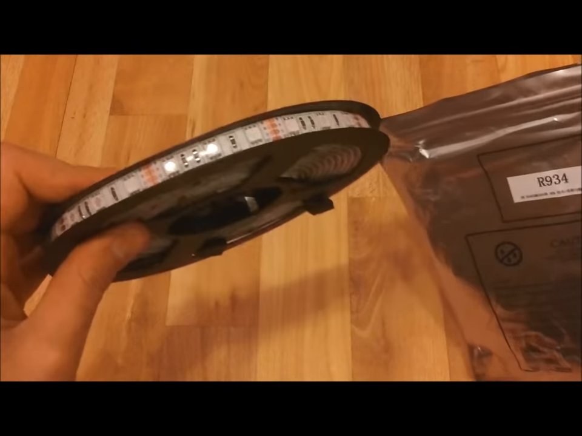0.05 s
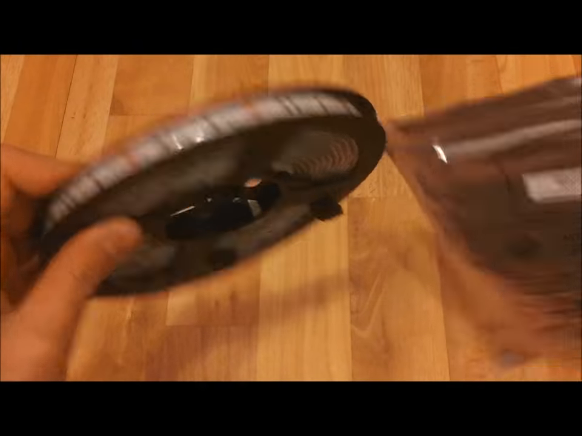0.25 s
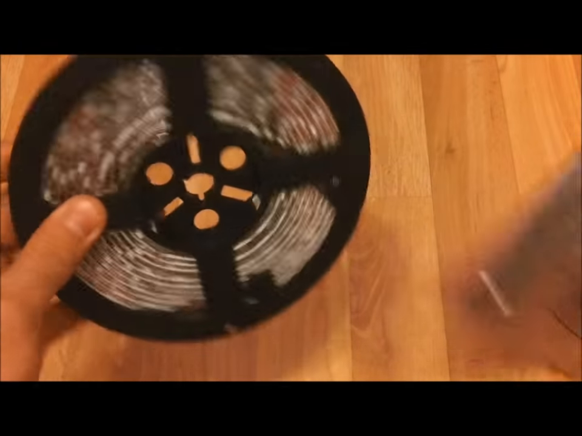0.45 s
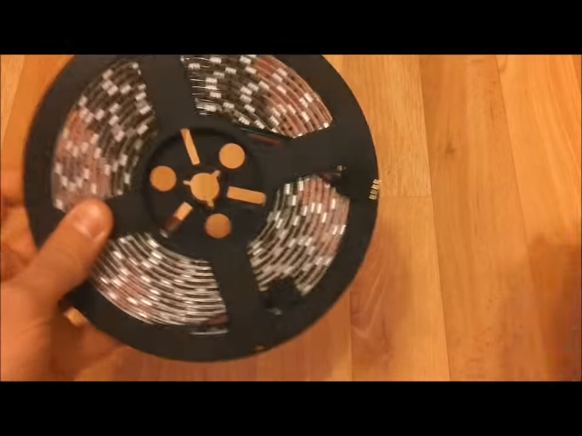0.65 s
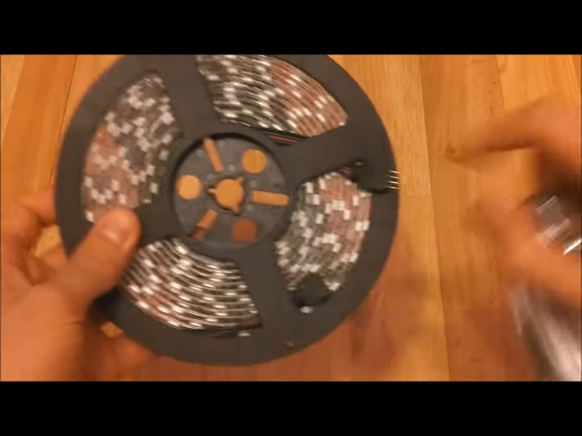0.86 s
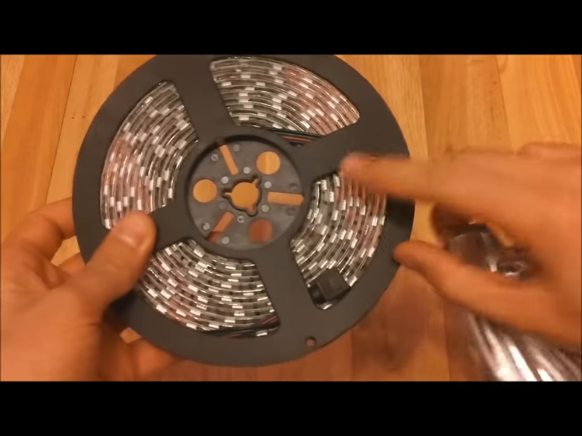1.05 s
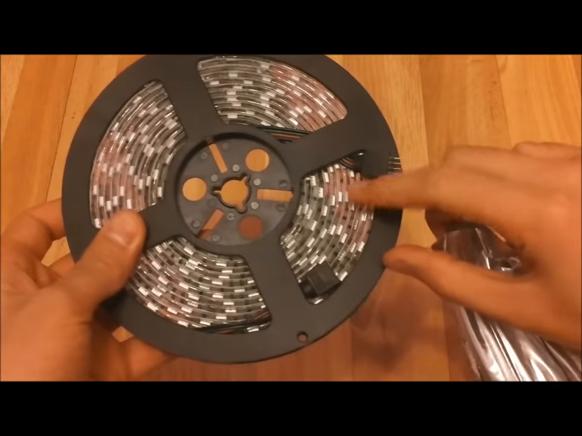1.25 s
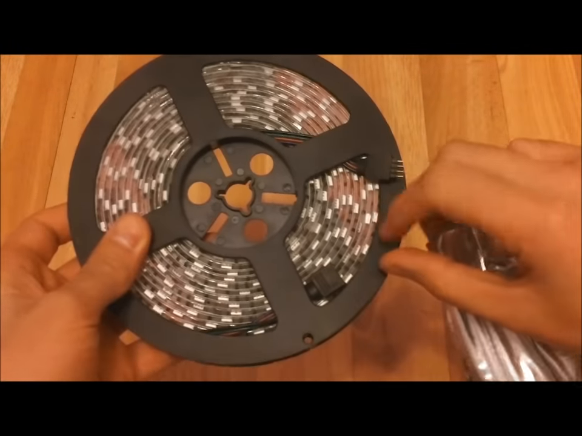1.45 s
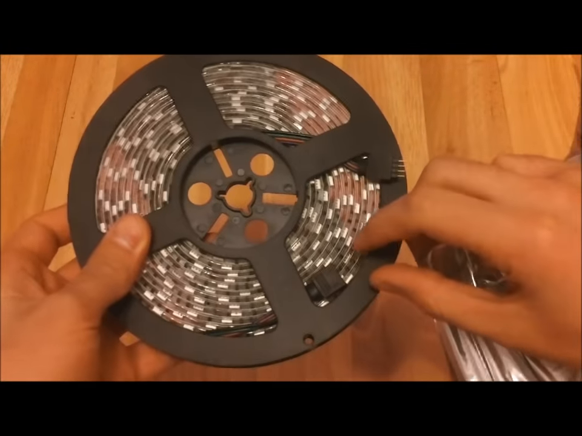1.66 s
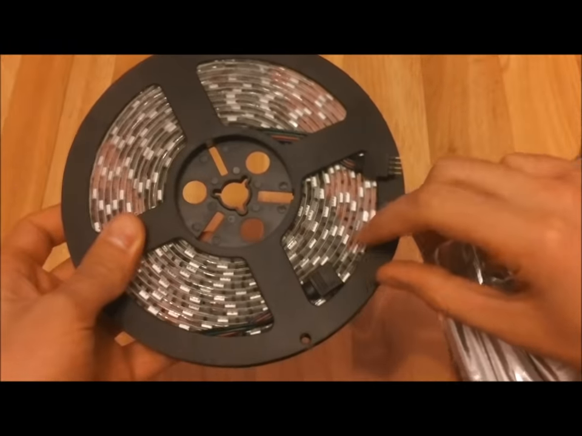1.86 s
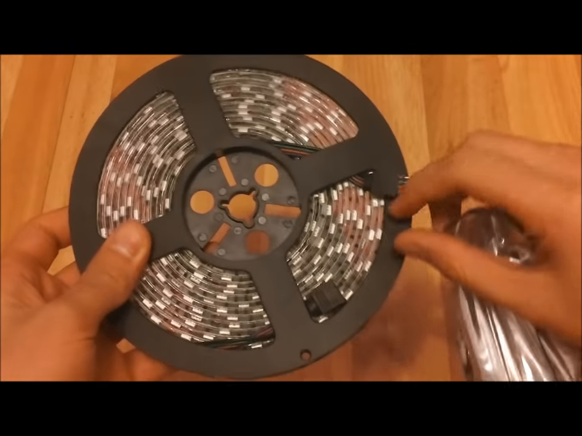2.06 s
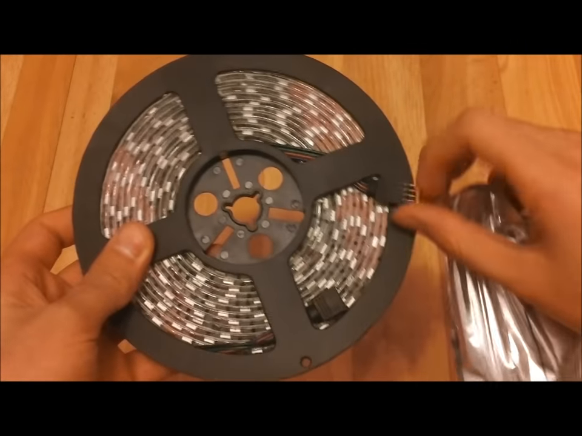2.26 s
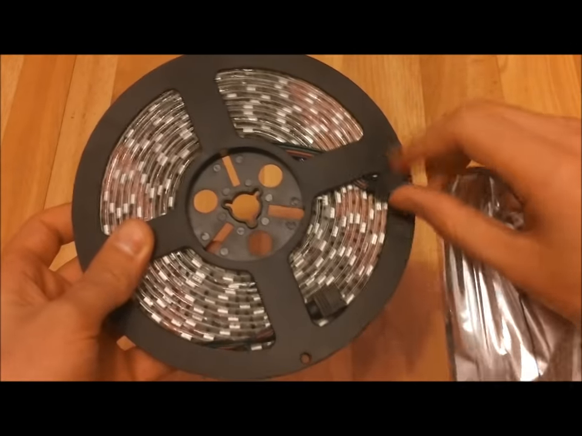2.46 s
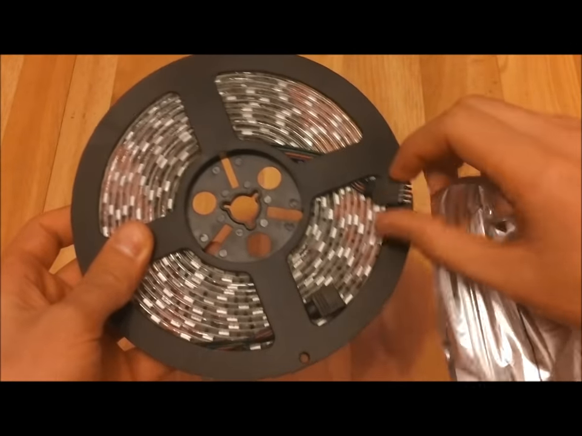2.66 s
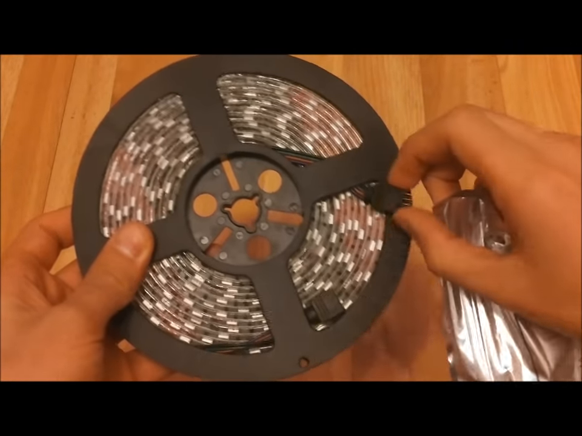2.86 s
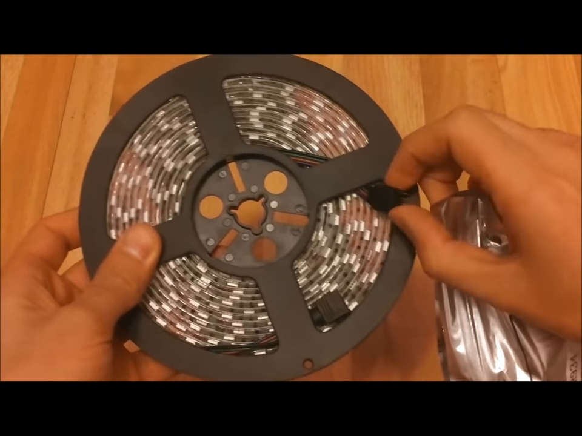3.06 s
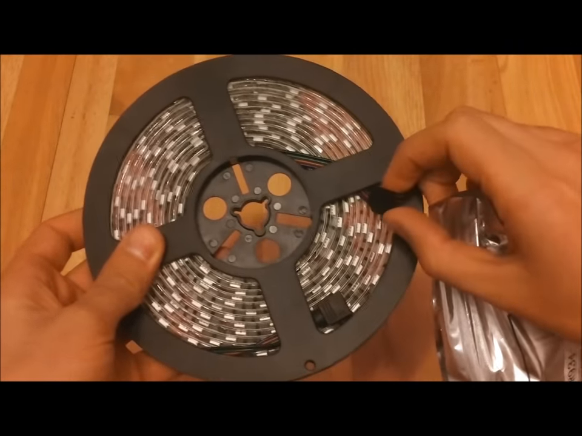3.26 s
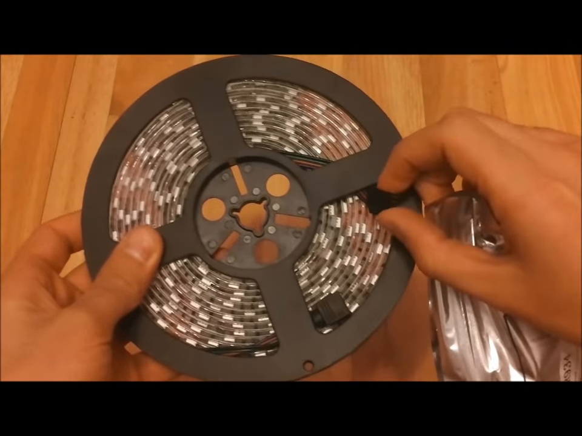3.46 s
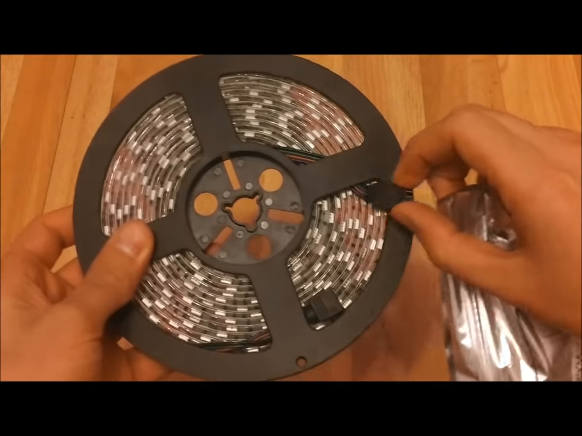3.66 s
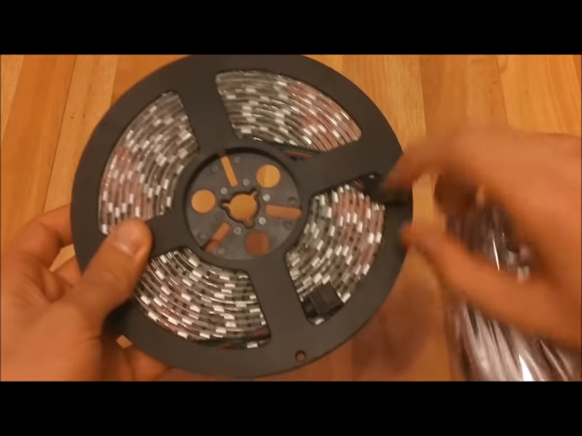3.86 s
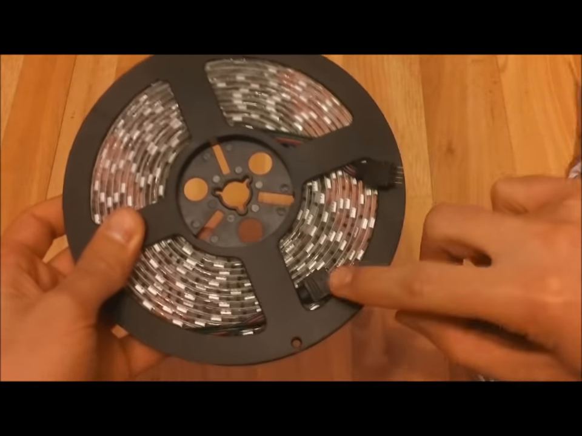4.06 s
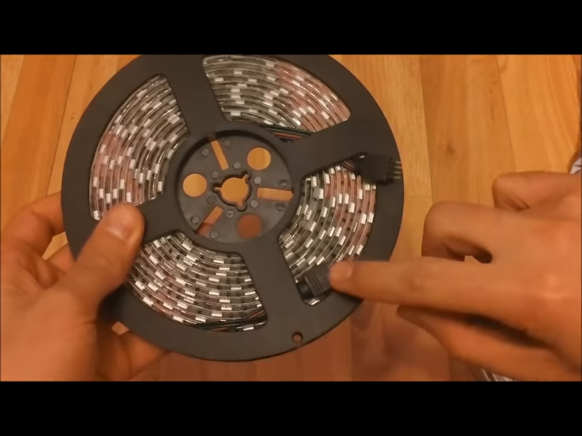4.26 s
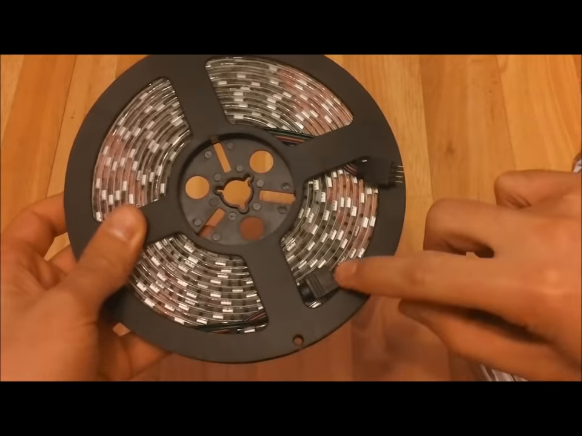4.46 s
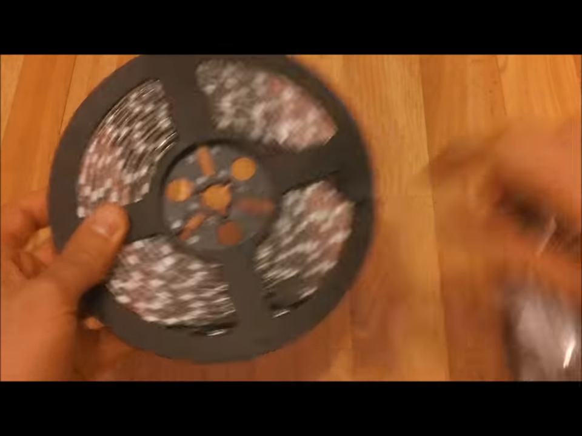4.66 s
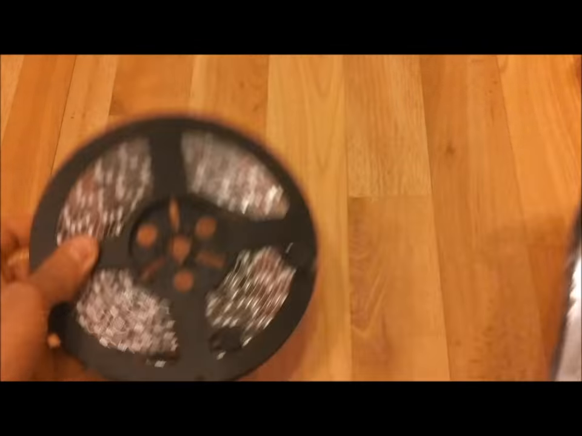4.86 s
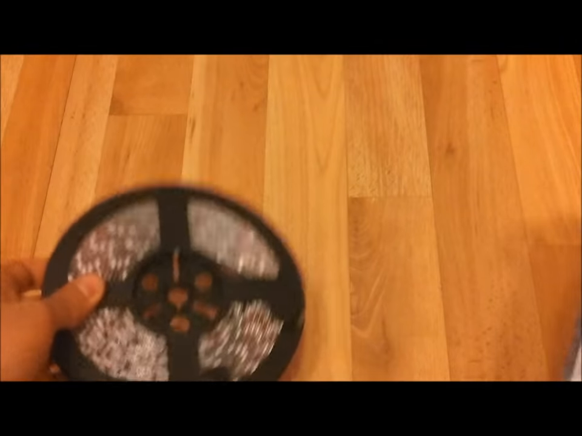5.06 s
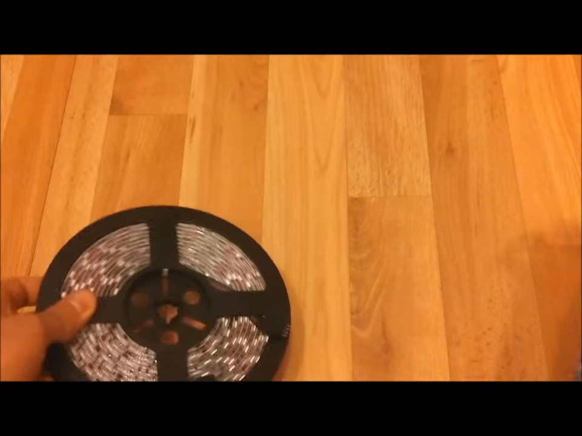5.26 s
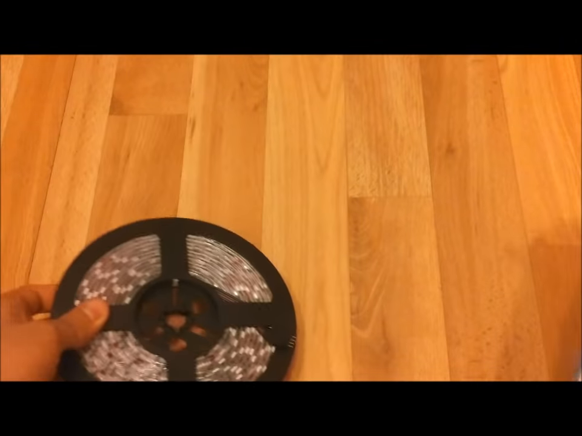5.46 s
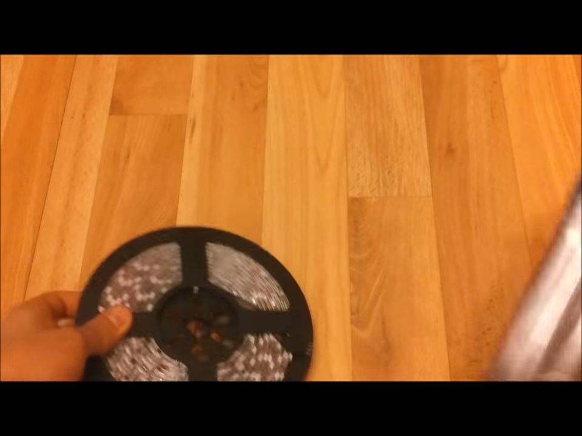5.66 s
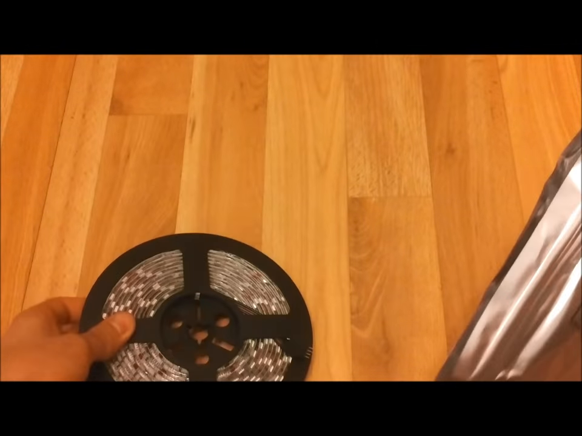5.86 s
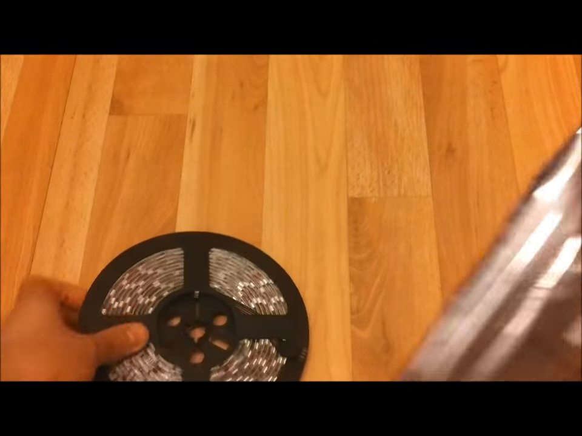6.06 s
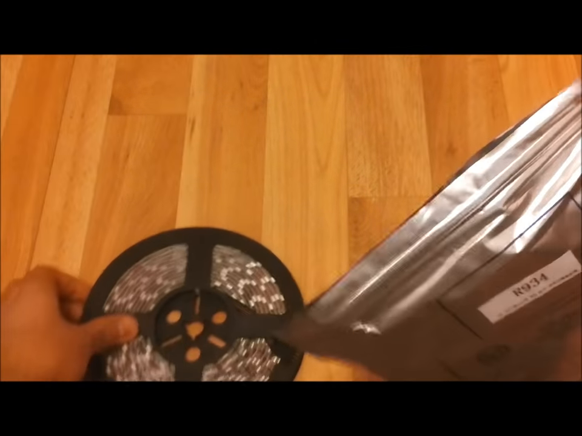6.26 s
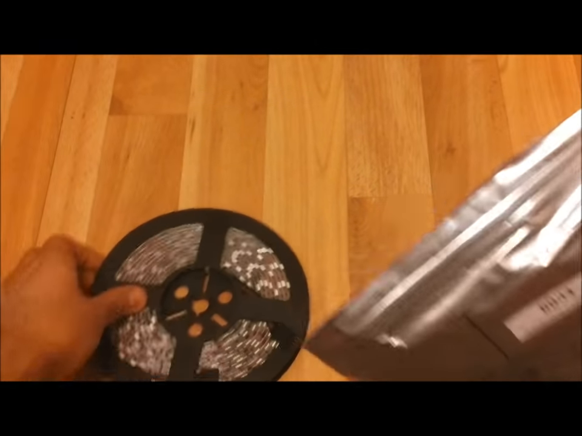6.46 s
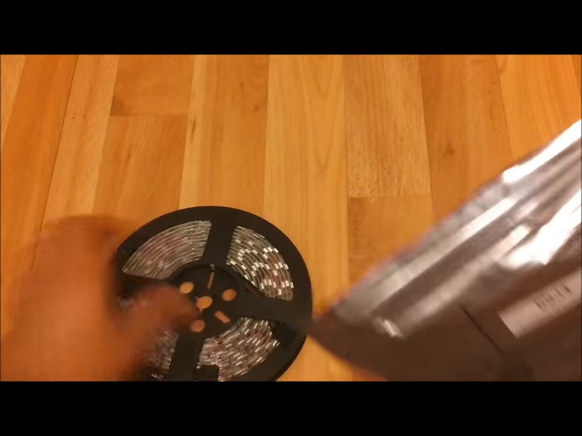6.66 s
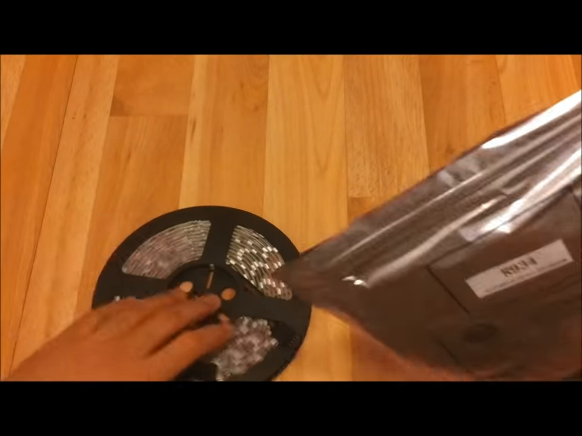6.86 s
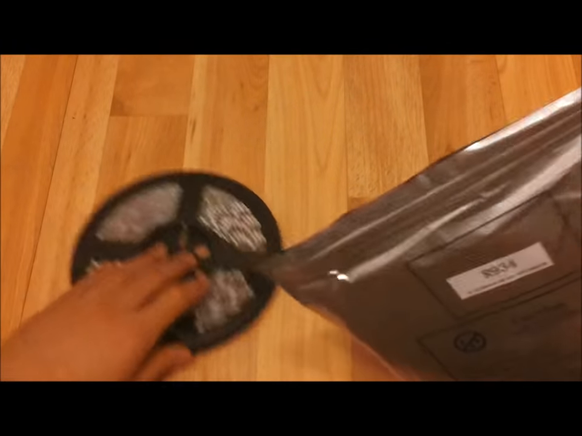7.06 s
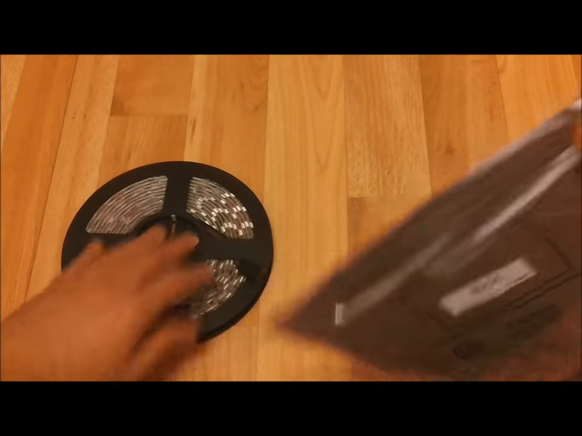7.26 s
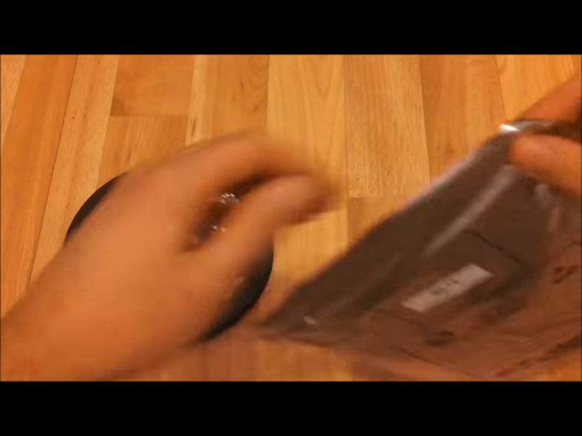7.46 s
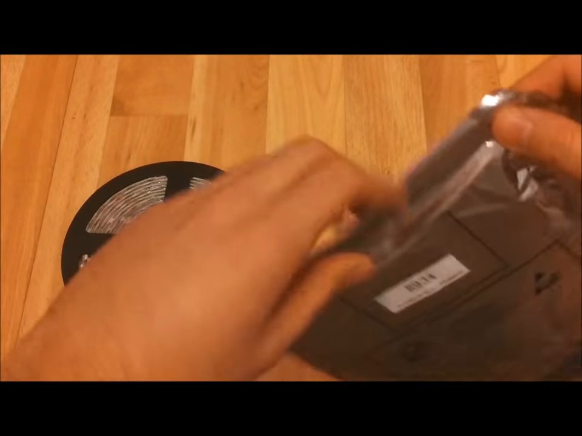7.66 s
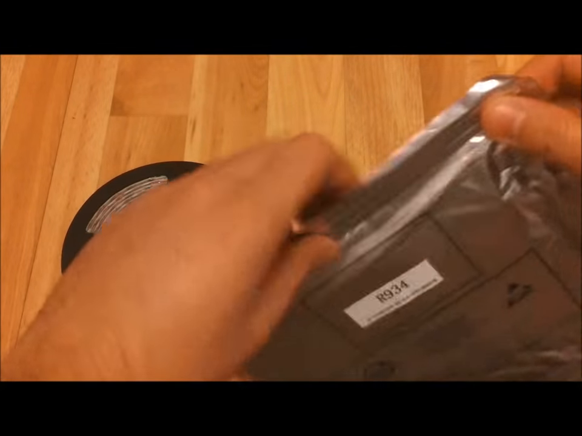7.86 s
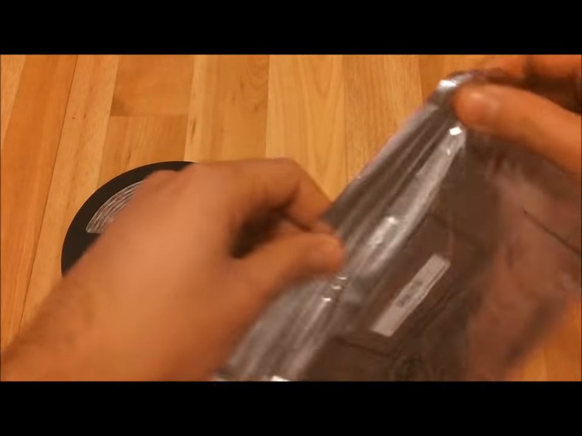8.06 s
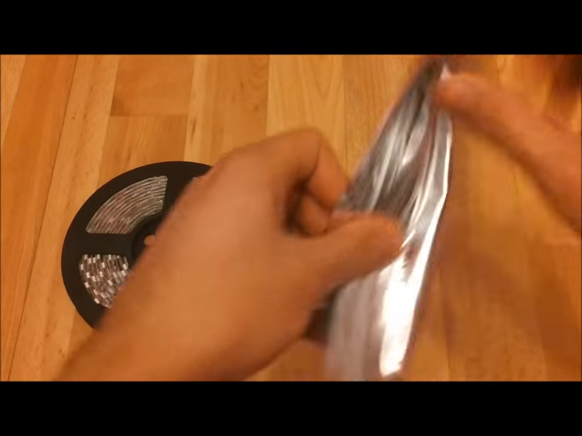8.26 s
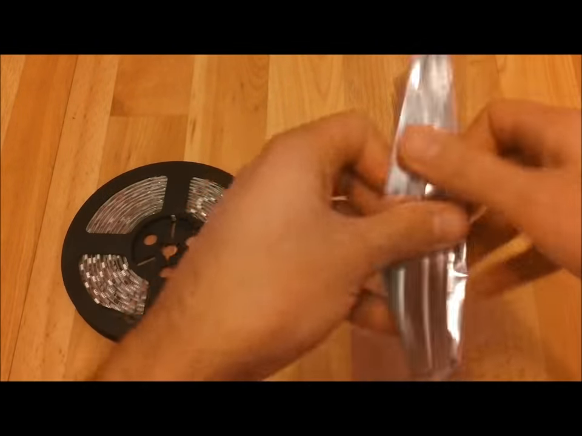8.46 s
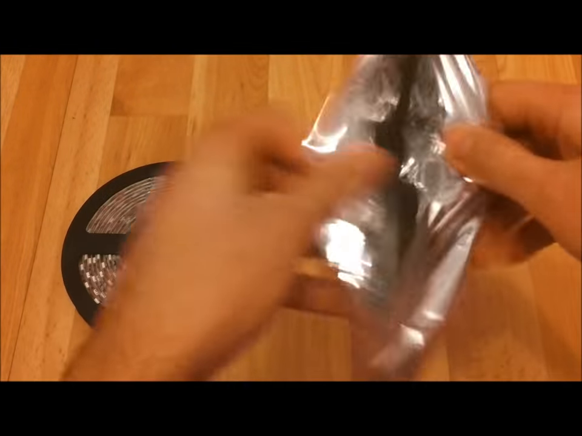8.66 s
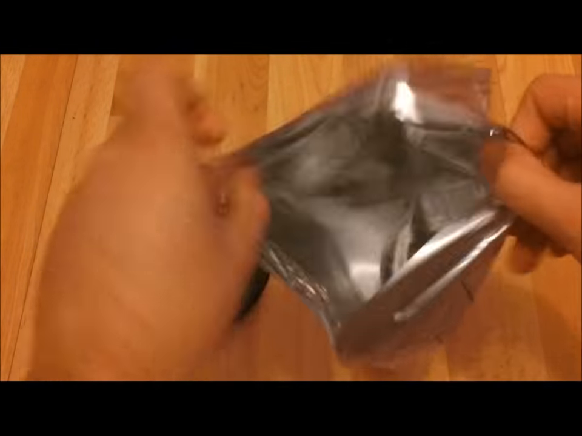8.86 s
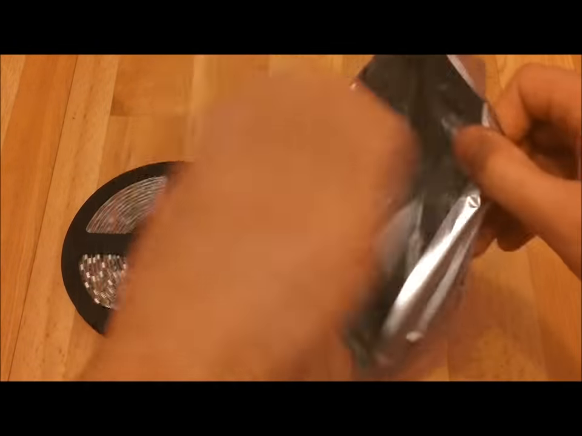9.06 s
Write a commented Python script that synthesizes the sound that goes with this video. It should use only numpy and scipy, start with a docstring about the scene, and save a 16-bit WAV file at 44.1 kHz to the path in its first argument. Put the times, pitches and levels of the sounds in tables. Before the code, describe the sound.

Metallic foil bag snaps and crackles sharply, eases to sparse rustles and small taps, then is crumpled open in a loud, dense burst, close indoors.

```python
"""Creases of a metallised foil bag buckle in sharp snaps: hands pull a plastic reel out, then crumple it open.
Dense grain clicks, scaled by effort curves, crackle under them; noisier grains make film and fingers slide.
Modulated tones squeak, damped bands of noise knock and thump, and noise-tap reverberation rings after them.
A wavering murmur and hiss lie beneath; gain control ducks loud moments and the loudest snaps clip."""
import sys
import numpy as np
from scipy import signal
from scipy.fft import rfft, irfft
from scipy.io import wavfile
from scipy.ndimage import uniform_filter1d

SR = 44100
rng = np.random.default_rng(int(sys.argv[2]) if len(sys.argv) > 2 else 0)


def dump(signal):
    """Clip the signal to [-1, 1] and save it as 16-bit WAV at the path in sys.argv[1]."""
    limited = np.clip(np.atleast_2d(signal).T, -1, 1)
    pcm = np.round(limited * 32767).astype(np.int16)
    wavfile.write(sys.argv[1], SR, pcm)


N = 401301

# Relative colour of the foil film. Each row: frequency in Hz, density in dB per Hz.
FILM_COLOUR = [(60, -45), (200, -18), (450, -15), (1200, -13.5), (2400, -9), (3300, -7), (4800, -3.5),
               (6200, -1), (7600, -6), (9200, -14), (11200, -18), (13500, -30.5), (16000, -33.5)]
RING_REF_HZ = 5900  # ring pitch of a typical snap


def amp(db):
    """Decibels to gain."""
    return 10 ** (np.asarray(db) / 20)


def evened(x):
    """Scales to rms 1."""
    return x / np.sqrt(np.mean(x ** 2) + 1e-20)


def read(points, hz):
    """Reads a table on a log-frequency axis."""
    f, value = np.transpose(points)
    return np.interp(np.log(hz + 1), np.log(f + 1), value)


def add(mix, start_s, sound):
    """Mixes a sound in at its start time."""
    part = mix[max(round(start_s * SR), 0):][:len(sound)]
    part += sound[:len(part)]


def bins(size=1024):
    """Frequencies in Hz of a spectrum of this many samples."""
    return np.fft.rfftfreq(size, 1 / SR)


def below(hz, corner_hz, order=6):
    """Smooth step from 1 under the corner to 0 over it."""
    return 1 / (1 + (hz / corner_hz) ** order)


def wander(rate_hz):
    """Random drift of rms 1, mostly below rate_hz."""
    return evened(irfft(rfft(rng.standard_normal(N)) * below(bins(N), rate_hz), N))


def causal(gain):
    """Minimum-phase impulse response with this gain: sudden start, then ringing."""
    log_gain = np.log(np.maximum(gain, 1e-5))
    circle = np.concatenate([log_gain, log_gain[-2:0:-1]])
    return np.fft.ifft(np.exp(np.conj(signal.hilbert(circle)))).real


def grains(per_s, spread_db, gain, ring_hz, ring_db=12, width=.14, count=14):
    """Steady stream of clicks of very uneven size; each facet of the film rings at its own pitch."""
    size_db = spread_db * np.minimum(rng.exponential(1, N), 3.6)
    size = amp(size_db) * rng.choice([-1, 1], N)
    clicks = size * (rng.random(N) < per_s / SR)
    facet = rng.integers(0, count, N)
    out = np.zeros(N)
    for k, pitch_hz in enumerate(np.geomspace(*ring_hz, count)):
        ring = amp(ring_db / (1 + ((bins() / pitch_hz - 1) / width) ** 2))
        out += signal.oaconvolve(clicks * (facet == k), causal(gain * ring))[:N]
    return evened(out)


def buckling(run_s, size, chatter=0.26, linger=2.3):
    """Force of a crease that starts to give, flips, catches once more and chatters out."""
    t = np.arange(size) / SR
    decay = np.exp(-t / (linger * run_s))
    force = chatter * rng.standard_normal(size) * decay * np.sqrt(run_s / .002)
    force[0] += .3  # starts to give
    add(force, rng.uniform(.0001, .0003), np.ones(1))
    catch = min(run_s / .0022, 1) * rng.choice([-1, 1])
    add(force, run_s * rng.uniform(0.69, 1.), np.array([catch]))
    return force


def snap(level_db, ring_hz, body_db, fizz_db, run_s, ring_db=6, width_hz=800, panel_db=7,
         panel_width_hz=300, diffuse_db=-0.5, size=1024, count=177):
    """Buckling force excites crease and panel resonances: sound straight ahead, and sound sent all around."""
    hz = bins(size)
    run_s = max(run_s, 1 / SR)
    force = buckling(run_s, size)
    crease = ring_db / (1 + ((hz - ring_hz) / width_hz) ** 2)
    panel = panel_db / (1 + ((hz - rng.uniform(790, 3000)) / panel_width_hz) ** 2)
    colour = amp(read(FILM_COLOUR, hz) + crease + panel)
    # body below 3 kHz and fizz above 8.7 kHz are brought to their given levels re the ring
    power = colour ** 2
    body, fizz = below(hz, 3000), 1 - below(hz, 8700, order=16)
    ring_power = power[(hz > 3500) & (hz < 8500)].sum()
    body_now_db = 10 * np.log10(power[(hz > 500) & (hz < 3000)].sum() / ring_power)
    fizz_now_db = 10 * np.log10(power[hz > 9000].sum() / ring_power)
    balance_db = body * (body_db - body_now_db) + fizz * (fizz_db - fizz_now_db)
    click = causal(colour * amp(balance_db))
    ahead = signal.fftconvolve(force, click)[:size]
    ahead *= amp(level_db) / np.sqrt(np.mean(ahead[:count] ** 2))  # level over 4 ms
    # summed over all directions the notches of the chatter even out
    around = amp(diffuse_db) * click * np.linalg.norm(ahead) / np.linalg.norm(click)
    return ahead, around


def snaps(gain_db=-0.14):
    """Large creases buckle; harder ones fizz more and run longer, higher-pitched ones fizz more."""
    # Each row: start in seconds, level over 4 ms in dB before the common gain, ring pitch in Hz,
    # nominal body re ring in dB.
    creases = [(.363, -14.5, 5660, -18), (0.369, -25, 7200, -26), (.3744, -16, 7240, -14),
               (.455, -17.5, 6200, -6.5), (.468, -19, 5900, -14), (0.5113, -21.5, 5500, -33),
               (0.5524, -2.5, 6300, -13), (0.5578, -14.5, 6900, -11), (.5865, -12, 6300, -35),
               (0.6173, -13.5, 4040, -19), (0.6425, -11, 7640, -33), (0.6601, -17, 6800, -31),
               (0.6737, -15.5, 6130, -12.5), (0.6996, -18.5, 6700, -15.5), (0.721, -16, 5400, -9.5),
               (0.8245, -13, 5600, -21.5), (0.8351, -12.5, 6100, -19), (0.8531, -14, 6100, -12.5),
               (0.8724, -13, 5700, -14.5), (0.8775, -18, 5970, -6), (.9043, -12, 4640, -13.5),
               (0.9106, -7.5, 7200, -14), (0.9538, -14.5, 4170, -13.5), (0.9841, -11.5, 6200, -11),
               (1.0535, -14.5, 6000, -8.5), (1.0574, -24, 6800, -13.5), (1.1286, -20.5, 7400, -21),
               (1.2448, -19, 7440, -16.5), (1.5343, -19.5, 5600, -16), (1.6376, -29.5, 4300, -7.5),
               (1.7244, -21.5, 6060, -14.5), (1.7694, -26, 6300, -28), (1.8171, -20, 6130, -7.5),
               (2.5048, -52, 5710, -13), (2.8863, -33.5, 5810, -6.5), (4.0153, -30, 5880, -10.5),
               (4.0498, -22, 5720, -5.5), (4.1381, -33.5, 4540, -1.5), (5.1281, -49, 5720, -19),
               (5.5154, -49, 5340, 0.5), (5.6264, -26, 6940, -12), (5.6721, -20, 6900, -14),
               (5.7915, -27.5, 5040, -5.5), (6.0906, -20.5, 5880, -13), (6.161, -23.5, 4900, -6),
               (6.332, -37.5, 5380, -11), (6.346, -20.5, 4740, -14), (6.396, -27, 6140, -5),
               (6.4155, -40, 5300, -2), (6.4337, -37.5, 5210, -7), (6.593, -32.5, 4630, -6),
               (6.7065, -35.5, 5900, -6), (6.9054, -47, 5020, -6.5), (6.9456, -18.5, 6900, -21),
               (7.074, -22.5, 5000, -12), (7.1161, -31.5, 4080, -2), (7.2435, -45, 6410, -26),
               (7.2915, -23.5, 6250, -11.5), (7.4107, -36, 6050, -9), (7.4396, -24.5, 5800, -8.5),
               (7.4574, -19, 6160, -22), (7.4996, -22, 5900, -13.5), (7.6343, -28, 5740, -18),
               (7.647, -25, 5860, -13), (7.665, -25.5, 6050, -31), (7.688, -19.5, 6540, -10.5),
               (7.7685, -31.5, 5800, -9), (7.8897, -29.5, 6160, -8.5), (7.927, -23.5, 5150, -18),
               (7.9491, -25, 6350, -15), (7.9978, -31, 5080, -9), (8.065, -18, 6240, -4.5),
               (8.1031, -21, 6640, -38), (8.1715, -22, 6140, -3.5), (8.1802, -25, 5760, -13),
               (8.1887, -17.5, 5170, -4), (8.2181, -18.5, 5370, -5), (8.2639, -11, 5840, -18),
               (8.3094, -13.5, 4060, -10.5), (8.3349, -24.5, 8200, -25), (8.3568, -20.5, 5200, -15),
               (8.4148, -23, 5550, -1.5), (8.43, -17, 5240, -9), (8.448, -22.5, 4770, -20),
               (8.5012, -13.5, 6400, -13), (8.5335, -9.5, 5750, -20), (8.5496, -4, 6260, -22),
               (8.5854, -18, 6300, -17), (8.5991, -12, 5140, -18), (8.611, -5.5, 6000, -21),
               (8.618, -9, 4800, -13.5), (8.6458, -14, 5490, -18), (8.6588, -15, 5900, -16),
               (8.6648, -8.5, 5400, -19.5), (8.68, -8, 5750, -13), (8.723, -12.5, 6500, -11),
               (8.7319, -20, 4770, -8), (8.7532, -15.5, 6160, -7), (8.775, -8, 5700, -10),
               (8.7966, -10.5, 5900, -4), (8.8046, -16, 5900, -8), (8.8414, -8, 5800, -5.5),
               (8.86, -12.5, 6170, -18), (8.8701, -12, 6050, -21), (8.8754, -10, 6130, -25),
               (8.9409, -14, 6140, -8), (8.966, -23, 6580, -15), (8.9919, -15, 5420, -11.5),
               (9.048, -14, 6220, -14)]
    typical_db, typical_fizz_db, typical_run_s = -18.5, -12, .0013
    fizz_per_db, fizz_db_per_octave, fizz_scatter_db = 0.27, 5.5, 1.5
    run_growth_per_db, run_scatter = 0.02, .2  # in log run time
    direct, diffuse = np.zeros((2, N))
    luck = rng.standard_normal((len(creases), 2))
    for (start_s, level_db, ring_hz, body_db), (fizz_luck, run_luck) in zip(creases, luck):
        harder_db = level_db - typical_db
        octaves = np.log2(ring_hz / RING_REF_HZ)
        fizz_db = typical_fizz_db + fizz_per_db * harder_db + fizz_db_per_octave * octaves
        fizz_db += fizz_scatter_db * fizz_luck
        run_s = typical_run_s * np.exp(run_growth_per_db * harder_db + run_scatter * run_luck)
        ahead, around = snap(level_db, ring_hz, body_db, fizz_db, run_s)
        add(direct, start_s, ahead)
        add(diffuse, start_s, around)
    return amp(gain_db) * direct, amp(gain_db) * diffuse


def crumpling(crackle_db=-4.5, flex_db=-45.5, tick_db=-7.0, tick_tilt_db=3.0, clump_db=3, clump_hz=70):
    """Small creases give way in avalanches as the sheet bends; a few stand out as bright ticks."""
    # One curve of hand effort for each handful. Each row: time in seconds, effort in dB.
    handfuls = [
        [(.35, -42), (.38, -28.5), (.53, -34.5), (.57, -46), (.7, -29), (.78, -62.5)],
        [(.82, -38), (.83, -26), (.88, -16.5), (.94, -40), (1.0, -25), (1.1, -37), (1.14, -27), (1.17, -48)],
        [(5.4, -79.5), (5.62, -58), (5.9, -73), (6.35, -52), (6.8, -67), (7.25, -59), (7.6, -58)],
        [(7.62, -34), (7.7, -37.5), (7.85, -50.5), (7.94, -34.5), (8.15, -44), (8.27, -17.5), (8.34, -52),
         (8.39, -52)],
        [(8.39, -40.5), (8.45, -28), (8.52, -35), (8.66, -22), (8.74, -22), (8.81, -20.5), (8.87, -25),
         (8.92, -40), (8.97, -33), (9.1, -36)],
    ]
    flex_per_db, middling_effort_db = 0.62, -30.5  # flexing rises less steeply than the crackle
    t, hz, out = np.arange(N) / SR, bins(), np.zeros(N)
    colour, low = amp(read(FILM_COLOUR, hz)), below(hz, 2300)
    flex_colour = colour * low * (1 - below(hz, 150))
    tick_colour = colour * amp(tick_tilt_db * hz / RING_REF_HZ)
    crackle = grains(per_s=480, spread_db=3.5, gain=colour * (1 - low), ring_hz=(2400, 11000))
    flex = grains(per_s=800, spread_db=6.0, gain=flex_colour, ring_hz=(280, 2500), ring_db=11)
    ticks = grains(per_s=90, spread_db=3.5, gain=tick_colour, ring_hz=(3500, 11500), ring_db=8, count=6)
    avalanche = evened(amp(clump_db * np.clip(wander(clump_hz), -2, 2)))
    for rows in handfuls:
        time_s, level_db = np.transpose(rows)
        at = (t > time_s[0]) & (t < time_s[-1])
        effort_db = np.interp(t[at], time_s, level_db)
        bright = avalanche[at] * crackle[at] * amp(crackle_db) + ticks[at] * amp(tick_db)
        out[at] += bright * amp(effort_db)
        flex_now_db = flex_db + flex_per_db * (effort_db - middling_effort_db)
        out[at] += avalanche[at] * flex[at] * amp(flex_now_db)
    return out


def sliding(hiss_db=0.0, drag_db=-3.0, fizz_db=-13.5, skim=0.42, grip_db=1.95, grip_hz=110):
    """Film and fingers slip in dense uneven clumps: hiss, a duller drag under it and fizz on top."""
    # Each row: start in seconds, end in seconds, nominal mid-stroke level in dB, drag offset in dB.
    strokes = [(.225, .24, -59.5, 2.5), (0.269, 0.352, -47, -7), (1.167, 1.225, -36, -5.5),
               (1.432, 1.472, -32.5, -9.5), (1.603, 1.641, -47, 1), (1.944, 1.959, -36.5, -9.5),
               (1.96, 1.995, -27.5, -10.5), (2.027, 2.146, -47.5, 0.5), (2.12, 2.205, -45.5, -6),
               (2.538, 2.586, -54, -8), (2.717, 2.769, -53, -8.5), (2.873, 2.898, -45, -2),
               (4.013, 4.029, -38.5, -2.5), (4.032, 4.082, -34.5, -2.5), (4.089, 4.133, -39, -6),
               (4.6, 4.65, -67, -6), (4.76, 4.84, -69, 0.5), (5.119, 5.181, -64.5, -3.5),
               (5.422, 5.5, -59.5, -5), (5.679, 5.707, -37, -12.5), (6.006, 6.09, -54.5, -5.5),
               (6.116, 6.155, -42, -4), (6.204, 6.262, -41.5, -16.5), (6.454, 6.557, -52, -4),
               (6.947, 7.081, -40.5, -8), (7.079, 7.182, -39.5, -4), (7.574, 7.638, -48.5, .5)]
    # Relative colour of sliding. Each row: frequency in Hz, density in dB per Hz.
    rub_colour = [(80, -32.5), (250, -8.5), (450, -6.5), (800, -10), (1400, -10.5), (2800, -6.5),
                  (4200, -6.5), (6200, 0), (8000, -5.5), (11000, -15.5), (13000, -23.5), (16000, -31.5)]
    swell_db = 5.5  # rise over a stroke as it gathers speed
    hz, out = bins(), np.zeros(N)
    colour = amp(read(rub_colour, hz))
    low, high = below(hz, 2400), 1 - below(hz, 8300, order=12)
    hiss_colour = colour * (1 - low) * (1 - high)
    drag_colour = colour * low * (1 - below(hz, 150))
    hiss = grains(per_s=6100, spread_db=3.5, gain=hiss_colour, ring_hz=(2600, 8000), ring_db=7.0)
    drag = grains(per_s=2000, spread_db=3, gain=drag_colour, ring_hz=(300, 2400), ring_db=12.5)
    fizz = grains(per_s=10000, spread_db=0.0, gain=colour * high, ring_hz=(8000, 12000), ring_db=3.0)
    grip = evened(amp(grip_db * wander(grip_hz)))
    for start_s, end_s, level_db, body_db in strokes:
        at = np.arange(round(start_s * SR), round(end_s * SR))
        swell = amp(level_db + swell_db * np.linspace(-.5, .5, len(at)))
        pressure = grip[at] * swell * signal.windows.tukey(len(at), .12)
        # a light, skimming stroke has less drag and more fizz
        slips = amp(hiss_db) * hiss[at] + amp(drag_db + body_db) * drag[at]
        slips += amp(fizz_db - skim * body_db) * fizz[at]
        add(out, start_s, pressure * slips)
    return out


def squeaks(width_hz=330):
    """A fingertip sticks and slips unevenly, ringing a narrow band that shifts with the film's tension."""
    # Each row: start in seconds, end in seconds, first pitch in Hz, last pitch in Hz,
    # level before fades in dB.
    rubs = [(2.102, 2.194, 3840, 4130, -46), (6.437, 6.555, 1750, 1460, -59)]
    out = np.zeros(N)
    for start_s, end_s, first_hz, last_hz, level_db in rubs:
        length = round((end_s - start_s) * SR)
        noise = rfft(rng.standard_normal(SR)[:length])
        slips = irfft(below(bins(length), width_hz, order=4) * noise, length)
        ring = np.sin(2 * np.pi * np.cumsum(np.linspace(first_hz, last_hz, length)) / SR)
        fade = signal.windows.tukey(length, .25)
        add(out, start_s, amp(level_db) * evened(slips * ring) * fade)
    return out


def knocks_and_thumps(rise_s=.002, width=.16, t60_s=0.04):
    """Knocks and low thumps: quickly damped ringing in a broad band."""
    # Each row: start in seconds, level before rise and decay in dB, pitch in Hz.
    hits = [(.553, -49, 111), (.928, -28, 530), (.985, -48, 90), (2.887, -46, 444), (4.05, -38, 280),
            (4.051, -28, 3500), (4.083, -34, 327), (4.138, -42, 265), (6.707, -39.5, 1670),
            (7.832, -45, 1370), (8.612, -39, 70.6), (8.799, -29, 390), (8.838, -42, 231)]
    t, hz, out = np.arange(SR // 4) / SR, bins(SR // 4), np.zeros(N)
    for start_s, level_db, pitch_hz in hits:
        band = 1 / (1 + ((hz / pitch_hz - 1) / width) ** 2)
        phase = np.exp(2j * np.pi * rng.random(len(hz)))
        ring = evened(irfft(band * phase, len(t)))
        add(out, start_s, amp(level_db - 60 * t / t60_s) * ring * (1 - np.exp(-t / rise_s)))
    return out


def room(x, delay_s=.002, sparse_db=-1.0, build_s=.012, half_turns_per_s=1.7, count=3):
    """Small hard room: reflections build up, then die away; their pattern shifts as the bag moves."""
    # Reverberation. Each row: frequency in Hz, nominal t60 in seconds.
    reverb_t60 = [(200, 0.7), (800, 0.24), (2000, 0.32), (6000, .25), (10000, .22), (15000, .18)]
    # Share of the room. Each row: frequency in Hz, nominal level re the sound fed in, in dB.
    reverb_level = [(200, -2.5), (1000, -1.5), (3000, -6), (6300, -6), (9000, -5), (15000, -4.5)]
    t, clock_s, out = np.arange(SR // 2) / SR, np.arange(N) / SR, np.zeros(N)
    for k in range(count):
        taps = rng.standard_normal(len(t)) * (rng.random(len(t)) < 5000 / SR)
        hz, age_s, z = signal.stft(taps, SR, nperseg=256)
        decay_db = -60 * age_s / read(reverb_t60, hz)[:, None]
        decay = amp(decay_db + sparse_db * np.exp(-age_s / build_s))
        decay *= amp(read(reverb_level, hz))[:, None] / np.sqrt(np.mean(decay ** 2, 1, keepdims=True))
        tail = signal.istft(z * decay, SR, nperseg=256)[1][:len(t)] / np.linalg.norm(taps)
        share = np.sqrt(2 / count) * np.cos(np.pi * (half_turns_per_s * clock_s + k / count))
        add(out, delay_s, signal.oaconvolve(x * share, tail))
    return out


def quiet(level_db=-61, waver_db=2.5, waver_hz=5):
    """Shaped noise: faint microphone hiss over a low room murmur that wavers."""
    # Relative colour of the background. Each row: frequency in Hz, density in dB per Hz.
    background = [(25, -23), (60, -14.5), (100, -8), (150, -5.5), (220, -11), (350, -15), (600, -22),
                  (1200, -25), (2500, -30.5), (6300, -31), (15800, -32.5)]
    hz = bins(N)
    noise = rfft(rng.standard_normal(N)) * amp(read(background, hz))
    low = below(hz, 180)
    murmur = irfft(noise * low, N) * amp(waver_db * wander(waver_hz))
    hiss = irfft(noise * (1 - low), N)
    return amp(level_db) * evened(murmur + hiss)


def scene():
    """The bag and the reel, close by, in the room."""
    direct, diffuse = snaps()
    handling = crumpling() + sliding() + squeaks() + knocks_and_thumps()
    return (direct + handling + room(diffuse + handling) + quiet())[None]


def record(dry):
    """Gain control lifts pauses and ducks after loud sounds; peaks clip at full scale; then a low-pass."""
    duck_from_db, duck_depth_db, duck_share = -33, 2, 0.23  # share of the excess taken off
    recover_db_per_s, edge_hz = 59, 16000
    power_db = 10 * np.log10(abs(uniform_filter1d(dry[0] ** 2, size=177)) + 1e-12)  # over 4 ms
    fall_db = np.arange(N) / SR * recover_db_per_s
    held_db = np.maximum.accumulate(power_db + fall_db) - fall_db
    duck_db = np.clip(duck_share * (held_db - duck_from_db), 0, duck_depth_db)
    clipped = np.clip(dry * amp(duck_depth_db - duck_db), -1, 1)
    low_pass = signal.firwin(511, edge_hz, window=("kaiser", 9), fs=SR)
    return signal.oaconvolve(clipped, low_pass[None], "same")


dry = scene()
out = record(dry)
dump(out)
```